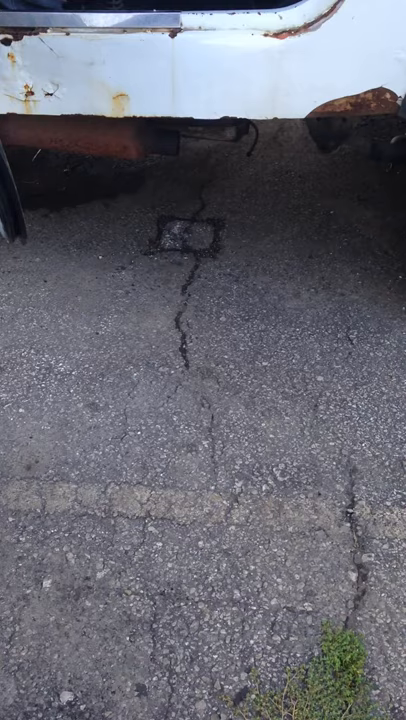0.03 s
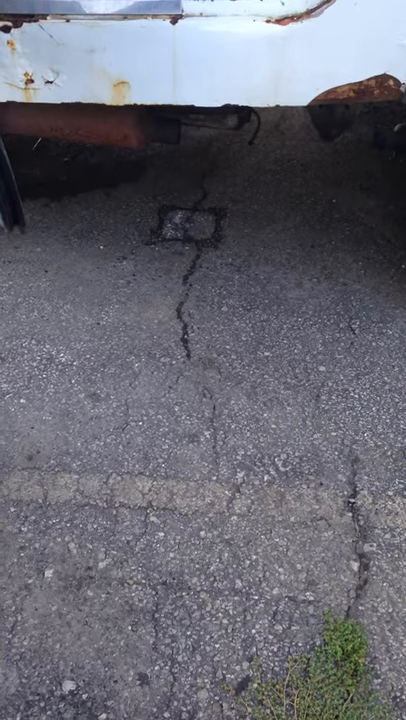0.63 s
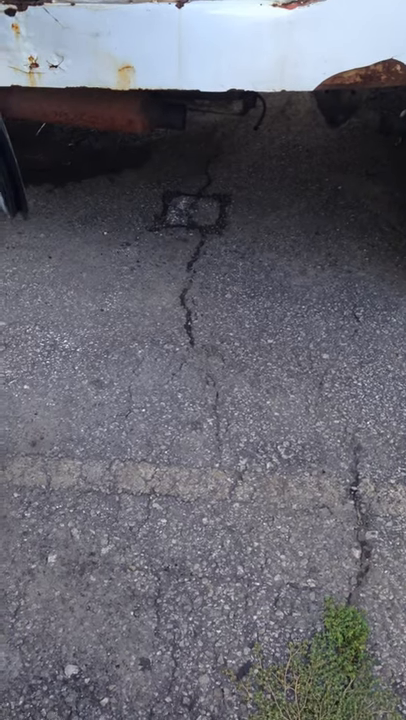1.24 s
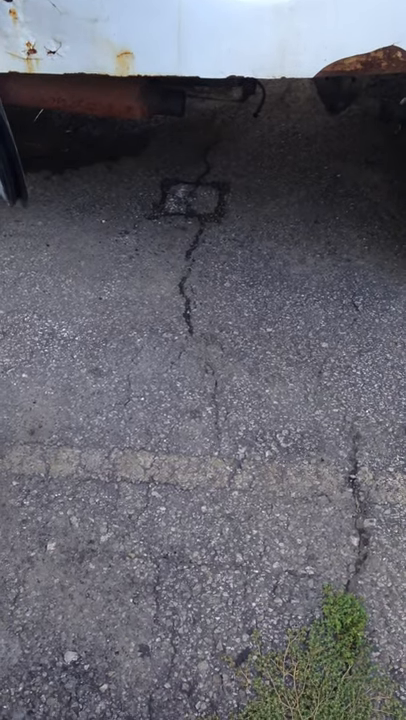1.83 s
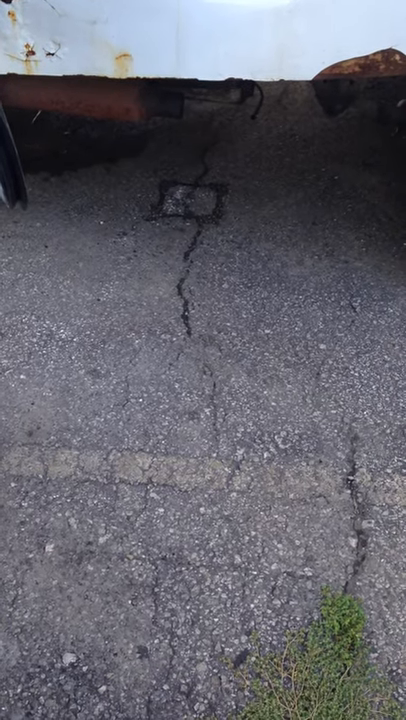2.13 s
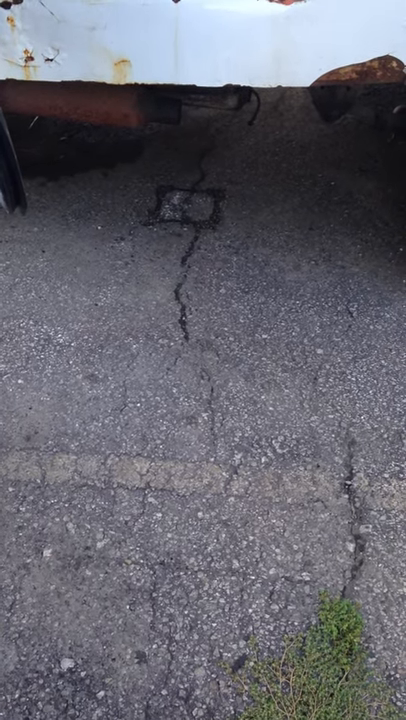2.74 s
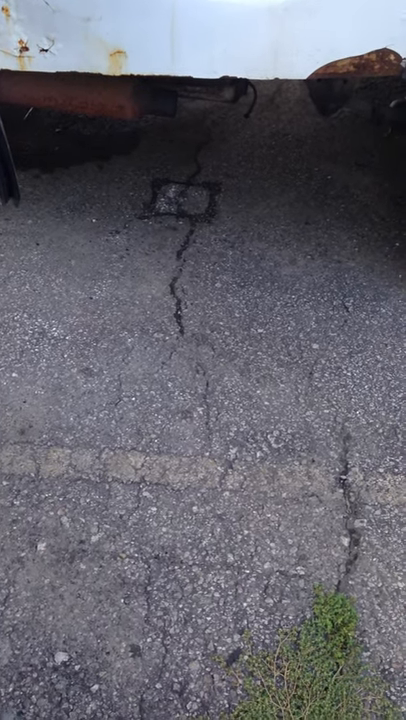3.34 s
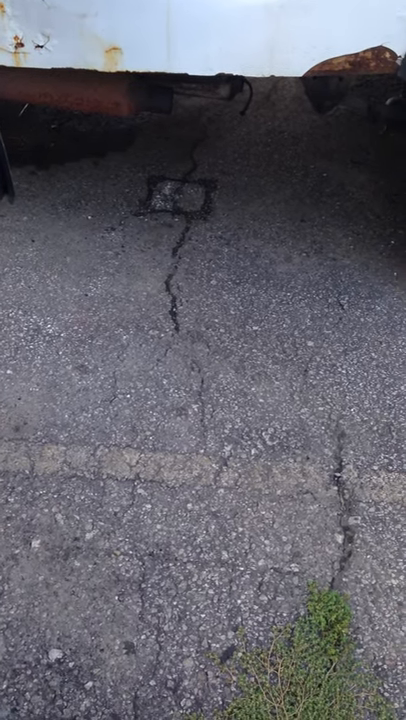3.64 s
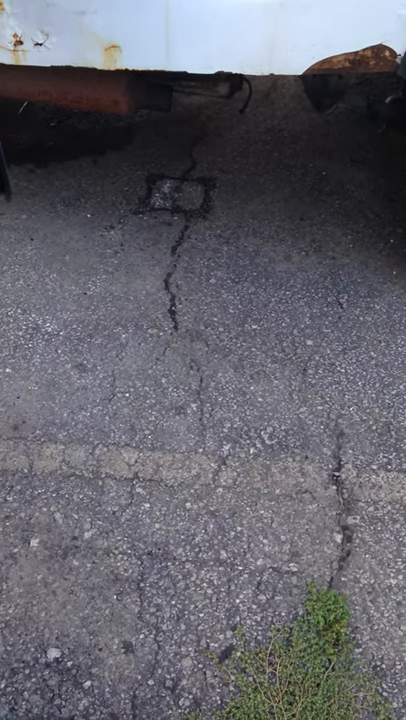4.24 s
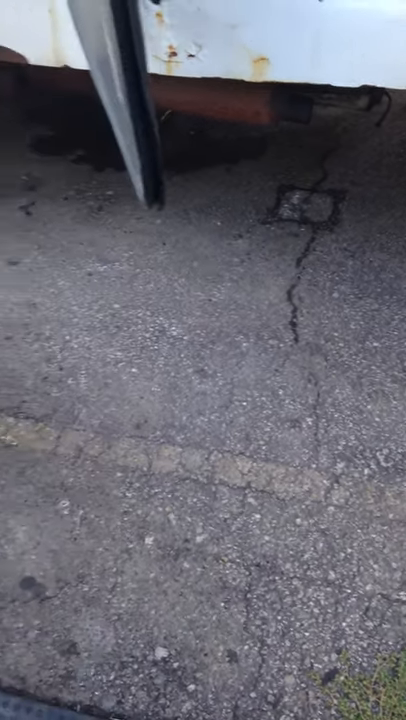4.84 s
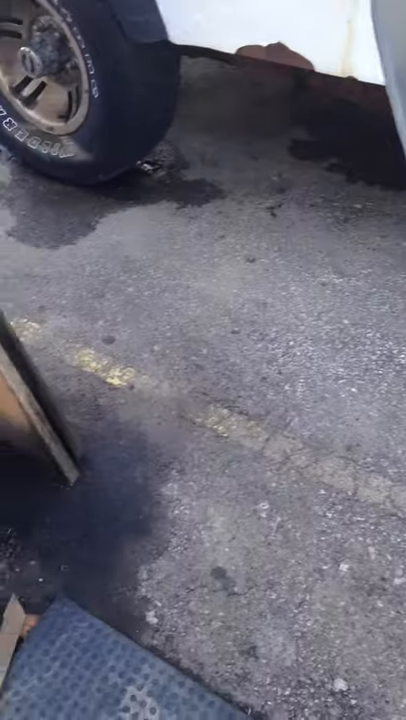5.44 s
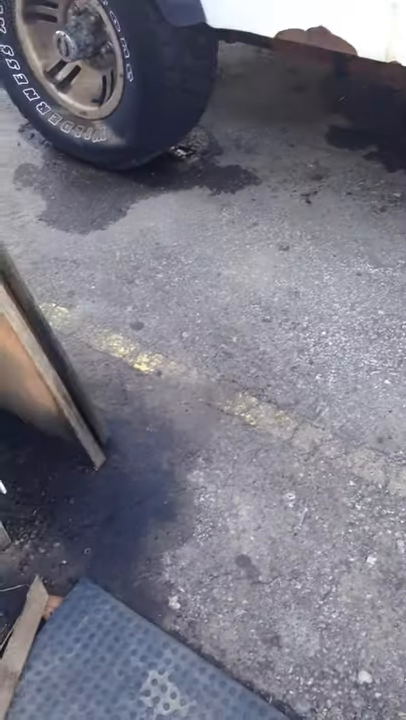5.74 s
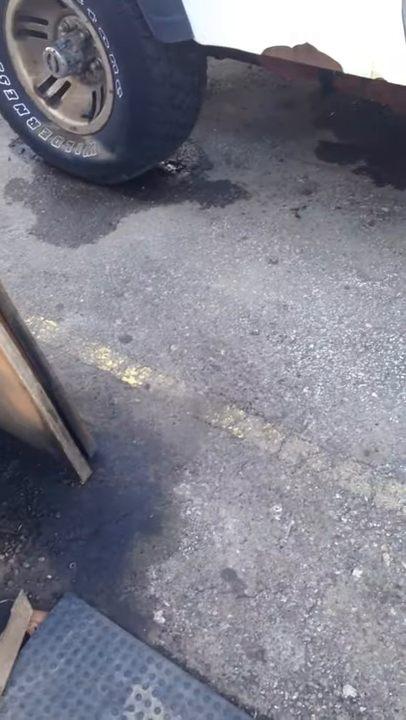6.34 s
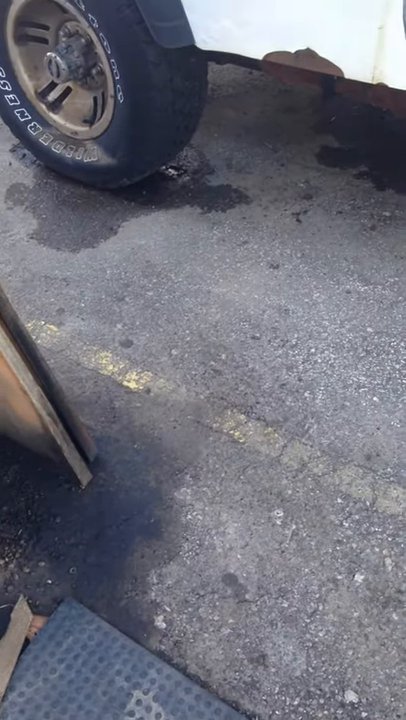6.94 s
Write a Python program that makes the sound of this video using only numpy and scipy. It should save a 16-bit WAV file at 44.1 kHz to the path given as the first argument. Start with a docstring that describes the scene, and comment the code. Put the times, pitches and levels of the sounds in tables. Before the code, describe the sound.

A low, lumpy rumble comes from a parked truck idling close by on open asphalt. Over it runs a regular, hissy ticking from a leak, with an occasional stronger spit. A brief rattling knock sounds on the body just before the engine slows from a fast idle to a relaxed one, and the ticking slows with it. Later comes a duller knock. Soft fan and belt noise and a low hum continue throughout.

```python
"""An old V8 truck idles: eight uneven exhaust pulses per engine cycle boom through two pipes.
Heard beside its door, on open asphalt; after 1.5 s it drops from fast idle to slow.
A leak spits a bright hiss once per cycle. Underneath: rustling fan and belts, valve ticks, a low hum,
and intake air at fast idle. Something on the body knocks twice.
At 5.4 s the rhythm jumps about 26 ms ahead, as in an audio dropout."""
import sys
import numpy as np
from scipy import signal
from scipy.fft import rfft, irfft
from scipy.io import wavfile
from scipy.ndimage import uniform_filter1d

SR = 44100
rng = np.random.default_rng(int(sys.argv[2]) if len(sys.argv) > 2 else 0)


def transcribe(u):
    """Save the signal u as a 16-bit wav file named by the first command-line argument.

    u: samples, shape (n,) or (channels, n), limited to [-1, 1]; the rate is SR.
    q: integer samples, one column per channel.
    """
    v = np.clip(np.atleast_2d(u).T, -1, 1)
    q = np.round(v * 32767).astype(np.int16)
    wavfile.write(sys.argv[1], SR, q)


N = 317520

# engine speed, two crank turns per cycle: time_s, cycle_hz
ENGINE_SPEED = [(0.0, 10.808), (0.45, 11.153), (0.7, 11.373), (1.52, 11.292), (1.8, 9.849), (2.1, 9.107),
                (2.85, 8.303), (3.25, 8.336), (3.5, 8.135), (3.95, 8.18), (4.9, 8.005), (5.9, 8.051),
                (6.35, 7.901), (7.2, 8.029)]
# fan and belt envelope: time_s, relative_db
FAN_LEVEL = [(0.35, -35), (1.02, -36), (2.6, -39), (2.87, -38), (3.68, -38.5), (4.92, -37), (7.1, -37.5)]
# fan and belt noise: freq_hz, density_db
FAN_SPECTRUM = [(200, -11.5), (380, -2.5), (540, -17), (620, -10), (900, -10), (1100, -16), (1550, -13.5),
                (2000, -18), (2500, -22), (3200, -18), (7300, -21), (12700, -23), (15500, -20.5)]
# valve ticks and small puffs: phase_cycles, sigma_s, centre_hz, width_hz, level_db
VALVE_TICKS = [(0.266, 0.0026, 5000, 1990, -41.5), (0.388, 0.006, 3160, 613, -42),
               (0.401, 0.0046, 8750, 7100, -40.5), (0.58, 0.0017, 12000, 4940, -45.5),
               (0.81, 0.0022, 11100, 8000, -38), (0.811, 0.0038, 860, 900, -38)]
# knocks on the body: start_s, rattle_db, thud_db
BODY_KNOCKS = [(1.248, -22.5, -25), (5.167, -32, -16)]
# knocked panel: mode_hz, width_hz, gain_db
PANEL_MODES = [(420, 76, -2), (620, 60, 10), (1180, 90, 7), (1540, 180, 8), (1780, 84, 2), (3520, 600, -11)]
# engine hum: cycle_multiple, slow_idle_db, fast_idle_db
HUM_ORDERS = [(5, -48, -36), (8, -37, -33), (9, -32, -40), (16, -50, -36), (24, -38, -40)]
# usual spit, weakest as the throttle closes: time_s, relative_db
USUAL_SPIT = [(.2, -32), (.65, -29.8), (1.6, -35.5), (2.1, -32.7), (3.65, -30.2), (7.1, -30.6)]
# harder spits: near_time_s, relative_db
STRONG_SPITS = [(1.249, -25), (2.226, -24.2), (3.044, -22.3), (3.895, -26.5), (4.509, -27), (5.133, -28.2),
                (6.607, -25.8)]
# leak jet: freq_hz, density_db
JET_SPECTRUM = [(1000, -10), (2500, -24), (3900, -22), (4500, -13), (5200, -7), (7000, -4.5), (8200, -1.5),
                (9700, 2.5), (11000, 0), (12700, 4.5), (15500, -4.5)]
# leaking pipe joint: mode_hz, width_hz, relative_db
JOINT_MODES = [(4510, 110, -18), (6010, 180, -19)]
# turbulent gas in the pipes: freq_hz, density_db
GAS_SPECTRUM = [(20, -49), (47, -1), (90, -4), (170, 3), (260, -8), (400, -10), (520, -27), (900, -36)]
# cylinder firings: phase_cycles, strength_db, bank_index
FIRING_ORDER = [(-.058, 3.9, 0), (.027, -2.8, 1), (.158, -10.8, 1), (.3, -9.2, 0), (.399, -1.7, 1),
                (.608, -12.8, 0), (.73, -.5, 0), (.78, 4, 1)]
# pipe and silencer of bank 0: mode_hz, width_hz, gain_db
NEAR_PIPE_MODES = [(75.6, 82.5, -33.5), (130.5, 89, -30), (136.7, 10.86, -29), (165.77, 21.44, -23.5),
                   (160.06, 42.1, -25), (238.6, 38, -52), (328, 8.1, -64)]
# pipe and silencer of bank 1: mode_hz, width_hz, gain_db
FAR_PIPE_MODES = [(87.66, 10.7, -29), (127.26, 10.3, -21), (129.3, 28.33, -20), (117, 103.7, -30.5),
                  (228.6, 12.2, -41), (285.3, 27.6, -33), (282.2, 42, -31)]

FIRST_SPIT_S = .183
DROPOUT_S, DROPOUT_CYCLES = 5.405, .208   # about 26 ms of the rhythm is cut


def from_db(db):
    """Decibels to gain."""
    return 10 ** (np.asarray(db) / 20)


def unit_rms(x):
    """Scale to rms 1."""
    return x / np.sqrt(np.mean(x ** 2) + 1e-20)


def time_s():
    """Time of every sample."""
    return np.arange(N) / SR


def resonate(x, centre_hz, width_hz):
    """Two-pole resonance, peak gain 1."""
    radius = np.exp(-np.pi * width_hz / SR)
    numerator = np.array([1, 0, -1]) * (1 - radius ** 2) / 2
    denominator = [1, -2 * radius * np.cos(2 * np.pi * centre_hz / SR), radius ** 2]
    return signal.lfilter(numerator, denominator, x + 1e-18)


def band_noise(centre_hz, width_hz):
    """Unit-rms noise through one resonance."""
    return unit_rms(resonate(rng.standard_normal(N), centre_hz, width_hz))


def shaped_noise(spectrum):
    """Unit-rms noise with the given spectral shape."""
    freq_hz, density_db = np.transpose(spectrum)
    bins_hz = np.maximum(np.fft.rfftfreq(N, 1 / SR), 1)
    gain = from_db(np.interp(np.log(bins_hz), np.log(freq_hz), density_db))
    return unit_rms(irfft(rfft(rng.standard_normal(N)) * gain, N))


def flicker(rate_hz):
    """Unit-rms random curve, rate_hz new values per second."""
    return unit_rms(np.interp(time_s() * rate_hz, np.arange(N), rng.standard_normal(N)))


def impulses(times_s, levels_db):
    """One-sample pulses."""
    out = np.zeros(N)
    index = np.round(times_s * SR).astype(int)
    inside = (index >= 0) & (index < N)
    out[index[inside]] = from_db(levels_db)[inside]
    return out


def cycle_hz():
    """Engine cycle rate at every sample."""
    return np.interp(time_s(), *np.transpose(ENGINE_SPEED))


def elapsed_cycles():
    """Engine cycles since the first spit, counting the part lost in the dropout."""
    t = time_s()
    cycles = np.cumsum(cycle_hz()) / SR + DROPOUT_CYCLES * (t > DROPOUT_S)
    return cycles - np.interp(FIRST_SPIT_S, t, cycles)


def cam_times_s(phase_cycles):
    """Times the camshaft passes a phase, less any lost in the dropout."""
    times_s = np.flatnonzero(np.diff(np.floor(elapsed_cycles() - phase_cycles)) > 0) / SR
    return times_s[np.abs(times_s - DROPOUT_S) > 2 / SR]


def fan(gain_db=1.0, flutter_db=1.46):
    """Fan and belts rustle under the bonnet."""
    envelope_db = np.interp(time_s(), *np.transpose(FAN_LEVEL))
    return from_db(envelope_db + gain_db + flutter_db * flicker(150)) * shaped_noise(FAN_SPECTRUM)


def intake(throttle, open_db=-43):
    """Air rushes past the throttle plate while it is open."""
    return from_db(open_db) * throttle * band_noise(centre_hz=1100, width_hz=1300)


def valve_gear(spread_db=.34):
    """Ticks and puffs: Gaussian bursts of ringing noise, locked to the camshaft."""
    out = np.zeros(N)
    for phase_cycles, sigma_s, centre_hz, width_hz, level_db in VALVE_TICKS:
        times_s = cam_times_s(phase_cycles)
        hits = impulses(times_s, level_db + spread_db * rng.standard_normal(len(times_s)))
        bursts = signal.fftconvolve(hits, signal.windows.gaussian(SR // 20, sigma_s * SR), "same")
        out += bursts * band_noise(centre_hz, width_hz)
    return out


def knocks(rise_s=.002, rattle_decay_s=.015, thud_decay_s=.021, thud_hz=105, thud_width_hz=70):
    """Each knock rattles a panel and thuds in the body behind it."""
    out = np.zeros(N)
    shake = rng.standard_normal(N)
    panel = unit_rms(sum(from_db(db) * resonate(shake, hz, width_hz) for hz, width_hz, db in PANEL_MODES))
    body = unit_rms(resonate(resonate(shake, thud_hz, thud_width_hz), thud_hz, thud_width_hz))
    for start_s, rattle_db, thud_db in BODY_KNOCKS:
        age_s = np.maximum(time_s() - start_s, 0)
        attack = 1 - np.exp(-(age_s / rise_s) ** 2)
        rattle = from_db(rattle_db) * np.exp(-age_s / rattle_decay_s) * panel
        thud = from_db(thud_db) * np.exp(-age_s / thud_decay_s) * body
        out += attack * (rattle + thud)
    return out


def engine_hum(throttle, waver_db=.8, throb_db=1.5, crest_cycles=.637):
    """Low tones at multiples of the cycle rate, swelling once per cycle."""
    cycles = elapsed_cycles()
    out = np.zeros(N)
    for order, slow_db, fast_db in HUM_ORDERS:
        rms = from_db(slow_db + (fast_db - slow_db) * throttle ** 2 + waver_db * flicker(4))
        out += rms * np.sqrt(2) * np.cos(2 * np.pi * round(order) * (cycles - crest_cycles))
    return out * from_db(throb_db * np.cos(2 * np.pi * cycles))


def spits(spread_db=.6):
    """Times and levels of the leak's spits: one per cycle, a few hard."""
    times_s = cam_times_s(0)
    levels_db = np.interp(times_s, *np.transpose(USUAL_SPIT))
    levels_db += spread_db * rng.standard_normal(len(times_s))
    for near_time_s, hard_db in STRONG_SPITS:
        levels_db[np.argmin(np.abs(times_s - near_time_s))] = hard_db
    return times_s, levels_db


def leak(gain_db=6.0, rise_s=.005, fall_s=.011, stretch_db_per_db=.06, sputter_db=1.0):
    """Each spit of gas hisses and rings the pipe joint; strong ones last longer."""
    t, flow = time_s(), np.zeros(N)
    times_s, levels_db = spits()
    median_db = np.median(levels_db)
    for peak_s, peak_db in zip(times_s, levels_db):
        span = slice(max(int((peak_s - .03) * SR), 0), int((peak_s + .09) * SR))
        age_s = (t[span] - peak_s) / from_db(stretch_db_per_db * (peak_db - median_db))
        envelope = np.exp(np.where(age_s < 0, -(age_s / rise_s) ** 2, -age_s / fall_s))
        flow[span] += from_db(peak_db) * envelope
    ring = sum(from_db(db) * band_noise(hz, width_hz) for hz, width_hz, db in JOINT_MODES)
    return flow * from_db(gain_db + sputter_db * flicker(700)) * (shaped_noise(JET_SPECTRUM) + ring)


def surge_power(boom):
    """Mean square over about 20 ms."""
    return uniform_filter1d(boom ** 2, size=900)


def turbulence(boom, throttle, slow_idle_db=-33, throttle_db=3.8):
    """Gas rushes with each exhaust surge, harder at fast idle."""
    surge = unit_rms(np.abs(surge_power(boom)) ** .75)
    return from_db(slow_idle_db + throttle_db * throttle) * surge * shaped_noise(GAS_SPECTRUM)


def compress(boom, knee_rms=.24):
    """Recorder-like compression evens out the loud exhaust surges."""
    return boom * (1 + surge_power(boom) / knee_rms ** 2) ** -.47


def cylinder_bank(bank, modes, lead_s, spread_db, jitter_s):
    """Four cylinders fire unevenly into one pipe, whose modes alternate in sign."""
    pulses = np.zeros(N)
    for phase_cycles, strength_db, bank_index in FIRING_ORDER:
        if round(bank_index) == bank:
            times_s = cam_times_s(phase_cycles) - lead_s
            time_draw, level_draw = rng.standard_normal((len(times_s), 2)).T
            pulses += impulses(times_s + jitter_s * time_draw, strength_db + spread_db * level_draw)
    return sum((-1) ** k * from_db(gain_db) * resonate(pulses, mode_hz, width_hz)
               for k, (mode_hz, width_hz, gain_db) in enumerate(modes))


def exhaust(throttle, gain_db=69.5, low_cut_hz=44, slow_cutoff_hz=305, fast_cutoff_hz=450):
    """Both banks boom; throttle sharpens the pulses, and the pipe ends radiate little deep bass."""
    near = cylinder_bank(0, NEAR_PIPE_MODES, lead_s=.003, spread_db=.5, jitter_s=.00008)
    far = cylinder_bank(1, FAR_PIPE_MODES, lead_s=.0048, spread_db=1.5, jitter_s=.00015)
    soft, hard = [signal.sosfiltfilt(signal.butter(3, hz, fs=SR, output="sos"), near + far)
                  for hz in (slow_cutoff_hz, fast_cutoff_hz)]
    pulses = soft + (hard - soft) * throttle
    radiation = signal.butter(2, low_cut_hz, "high", fs=SR, output="sos")
    return from_db(gain_db) * signal.sosfilt(radiation, pulses)


def scene():
    """The whole truck, mono."""
    throttle = np.interp(cycle_hz(), [8.1, 11.2], [0, 1])   # 0 slow idle, 1 fast idle
    boom = from_db(.4) * compress(exhaust(throttle))
    low_boom = from_db(-7) * resonate(boom, centre_hz=66, width_hz=22)   # thickens the exhaust
    bass = boom + low_boom + engine_hum(throttle) + turbulence(boom, throttle)
    return (bass + intake(throttle) + leak() + valve_gear() + fan() + knocks())[None]


def record(dry, start_s=.119, cutoff_hz=15600):
    """Silence until start_s; steep treble cut."""
    low_pass = signal.ellip(12, .1, 90, cutoff_hz, fs=SR, output="sos")
    return signal.sosfilt(low_pass, dry * (time_s() >= start_s))


dry = scene()
out = record(dry)
transcribe(out)
```